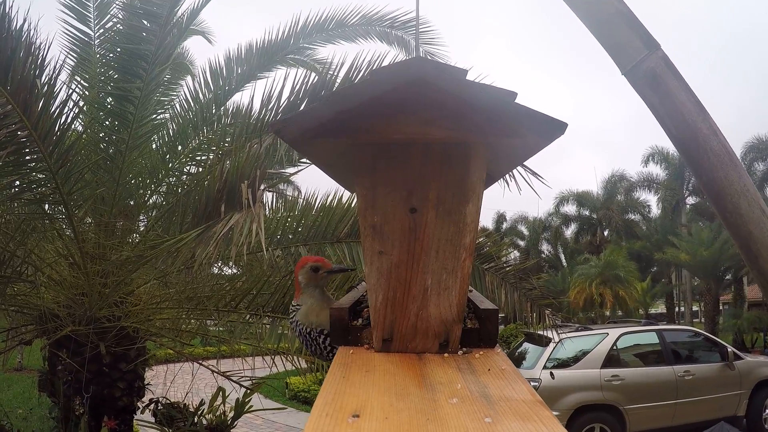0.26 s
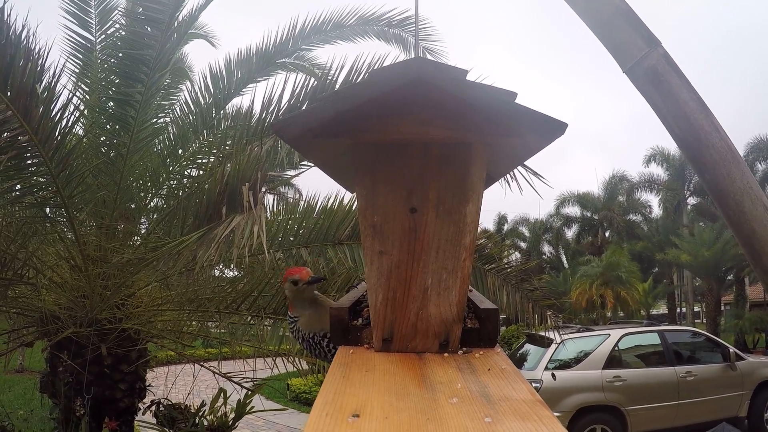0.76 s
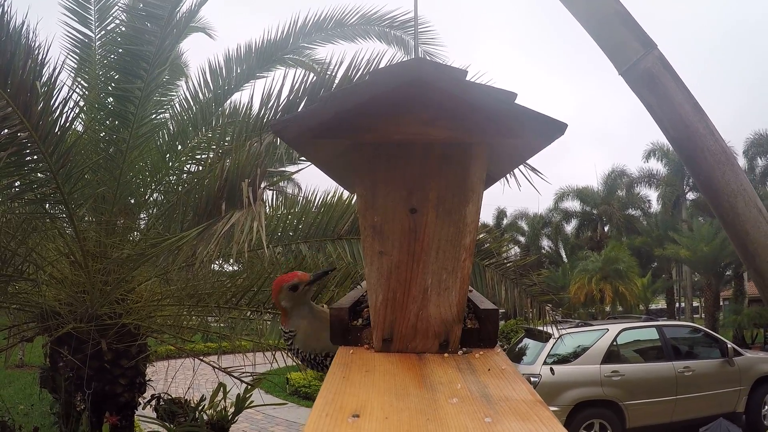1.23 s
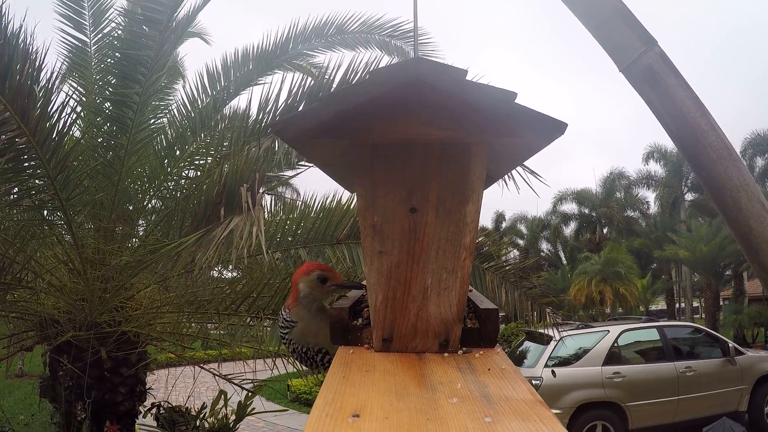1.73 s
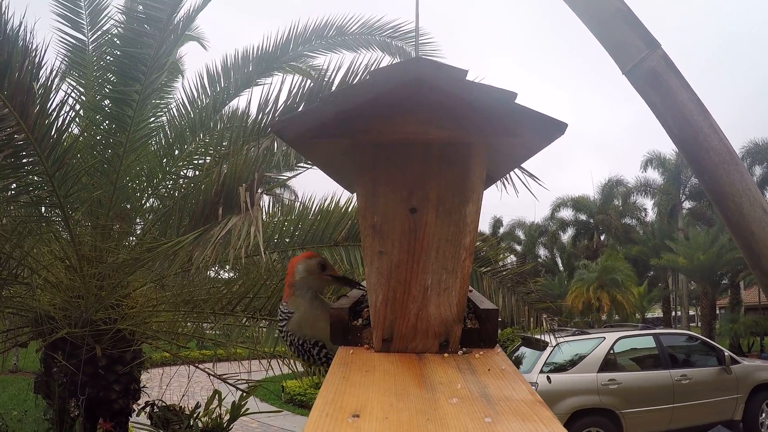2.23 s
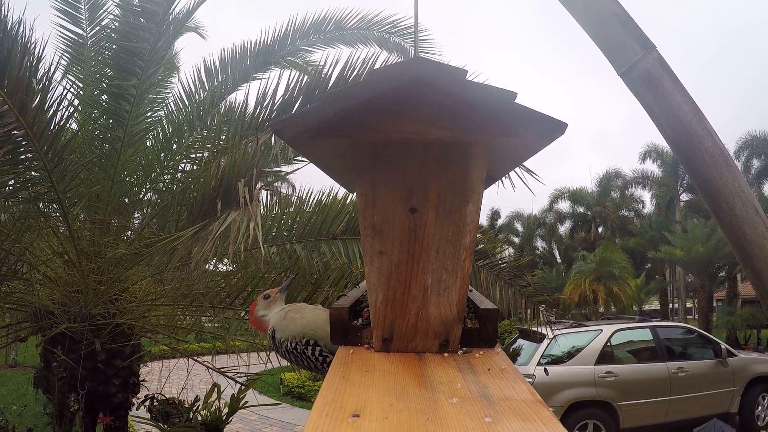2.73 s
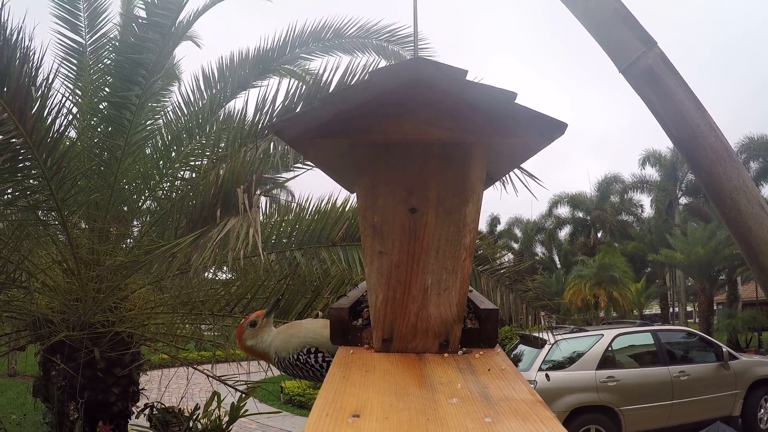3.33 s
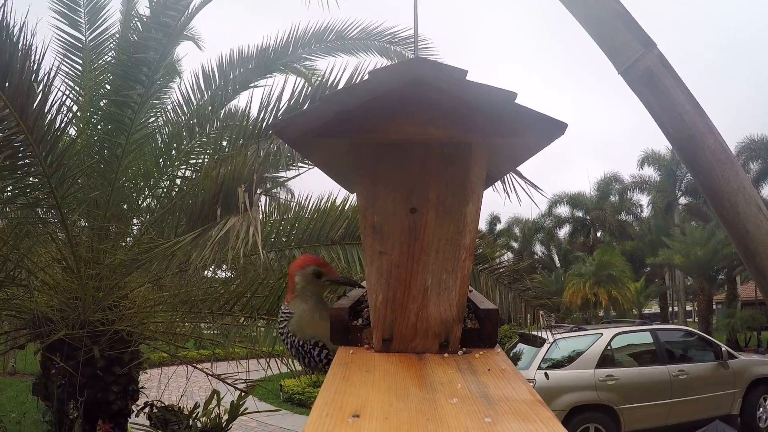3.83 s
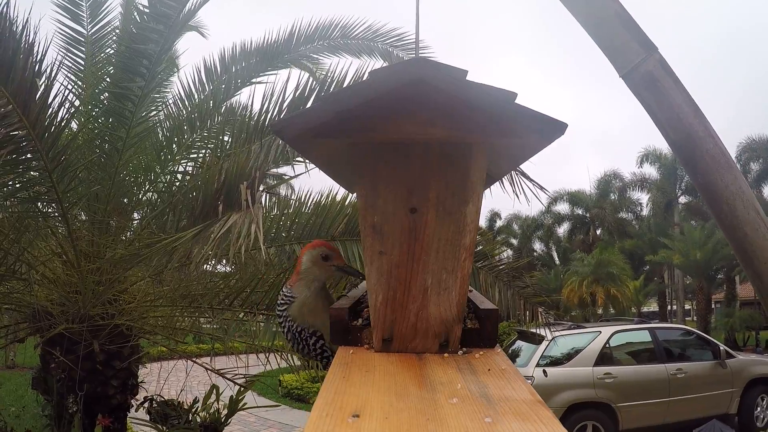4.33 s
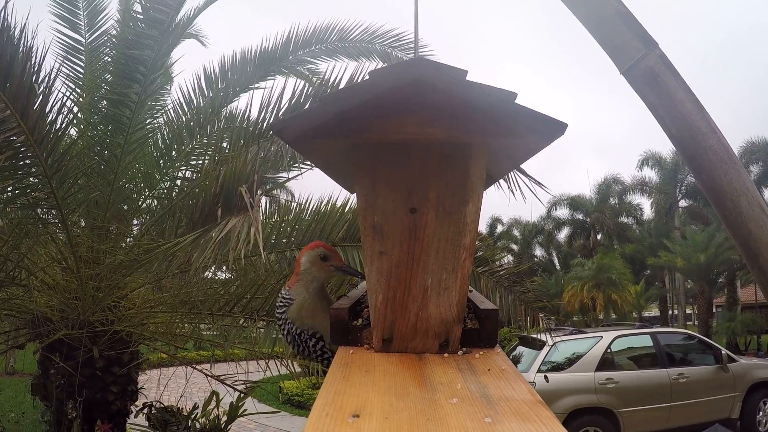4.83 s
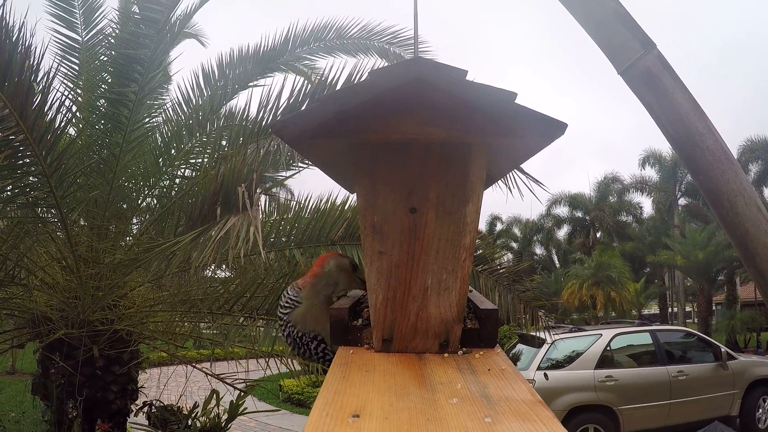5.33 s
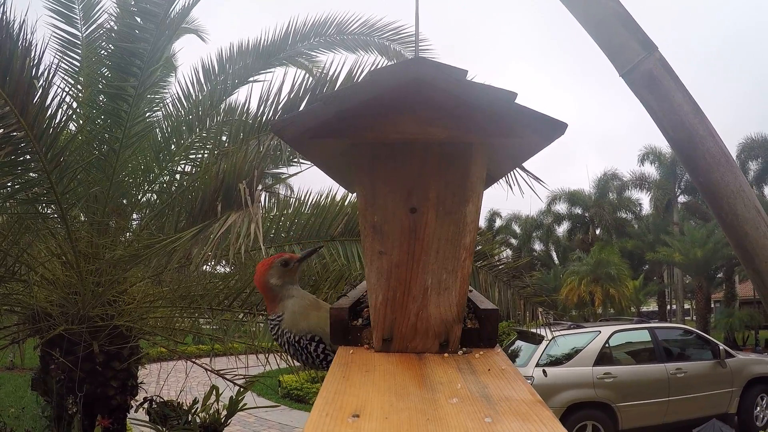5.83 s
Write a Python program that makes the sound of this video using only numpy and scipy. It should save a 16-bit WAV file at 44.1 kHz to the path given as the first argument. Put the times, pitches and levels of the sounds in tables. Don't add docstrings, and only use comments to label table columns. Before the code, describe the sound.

Irregular dry taps of beak and claws on thin boards, with small hollow thuds as weight shifts. The loudest cluster comes early, rattling and scraping for under half a second; afterwards sparse single knocks with quiet gaps. The plank-mounted microphone sways, giving a deep pulsing rumble, strongest at first. Quiet open-air garden, soft hiss, very faint far birds.

```python
import sys
import numpy as np
from scipy import signal
from scipy.io import wavfile
from scipy.ndimage import uniform_filter1d

SR = 44100
rng = np.random.default_rng(int(sys.argv[2]) if len(sys.argv) > 2 else 0)


def volts(x):
    e = np.asarray(x, float) / 20
    return 10 ** e


def dump(signal):
    limited = np.clip(np.atleast_2d(signal).T, -1, 1)
    pcm = np.round(limited * 32767).astype(np.int16)
    wavfile.write(sys.argv[1], SR, pcm)


N = 267510

# hz, t60_s, tray_db, wall_db, perch_db, rim_db (level by place struck)
LOW_MODES = [(342, 0.12, -11, -10, -10, -13), (562, 0.084, -16, -15.5, -7.5, -10),
             (442, 0.13, -17, -13.5, -1.5, -12), (659, 0.081, -3, -6, -7, -3.5), (738, 0.042, 3, 4, 7, -4),
             (816, 0.1, -7, 1, -3, -14)]
MIDDLE_MODES = [(955, 0.015, -9, -3, 0, -4.5), (1087, 0.026, -12.5, -3, 2, -10),
                (1268, 0.045, -19, -8.5, -15, -25), (1398, 0.037, -18, -2, 0, -7.5),
                (1628, 0.029, -3.5, -1.5, -6, -5.5), (1702, 0.014, -5, -4.5, -2.5, 2),
                (1789, 0.026, -4.5, -6.5, -35, -19)]
UPPER_MODES = [(1946, 0.071, -7, -4, -16, -15), (2082, 0.045, -18, -1, -3, 3),
               (2410, 0.017, -4, -3.5, -12, -19), (2578, 0.046, 0, -6.5, -8, -7)]
BRIGHT_MODES = [(2960, 0.036, 0, -11, -18, -14), (3400, 0.017, 8, -2.5, 2, -2),
                (3930, 0.015, -14, -9, -7, -3), (4300, 0.019, 3, -5, 4, -4.5),
                (4700, 0.0094, -15, -5, -6, -6), (5060, 0.0051, -12, -6, -19, -27),
                (5860, 0.012, -15, -7, -11, -1), (6470, 0.0049, -1, -5, -18, -15),
                (6800, 0.0055, -13, -26, -7, 2), (7860, 0.0067, -34, -7, -13, 1)]

# start_s, peak_db (middle modes), low_db, upper_db, bright_db (relative to middle)
TRAY_TAPS = [(0.1295, -31.5, -10.5, -16, -20), (0.1376, -39, -9.5, -16, -29), (0.38, -58, -6, -16, -10),
             (2.1784, -59.5, -5, -5, -10), (3.1246, -34, -8, -8, -22), (3.132, -51, -10, -3, -24),
             (4.1342, -62, -12, -6, -4), (5.6555, -39.5, -14, -20, -17), (2.7127, -55.5, -14, -18, -13),
             (4.0999, -60, 3, -13, -10)]
WALL_TAPS = [(0.0156, -48, -2, -3, -6), (0.025, -41.5, -2, -5, -9), (0.042, -30, -4.5, -17, -16.5),
             (0.3378, -53.5, -19, -15, -14), (0.7715, -54.5, -4, -17, -8), (1.084, -49, -13, -5, -18),
             (1.149, -34, -7.5, -12, -15), (1.156, -25, -18, -9.5, -22), (1.2281, -40.5, -12, -22, -17),
             (1.244, -39.5, -9.5, -25, -17), (1.362, -55, -8, -10, -18), (1.3996, -28, -10, -11.5, -18),
             (1.5087, -56, -2, -18, -15), (1.5489, -53, -6, -25, -19), (1.6376, -61, 2, -14, -11),
             (1.696, -51, -4, -16, -17), (1.7272, -47.5, -1.5, 0, -12), (1.759, -55.5, -8, -5, -10),
             (1.9743, -47, 0, -16, -20), (4.001, -59, -2, -11, -10), (4.1757, -49.5, -10, -5.5, -24),
             (4.1825, -52, -10, -11, -18), (5.656, -40.5, -20, -7.5, -20), (3.0404, -44, -1, -17, -20)]
PERCH_TAPS = [
    (0.2326, -52.5, 5, -16, -7),
    (1.092, -40, -0.5, -17, -25),
    (2.024, -36, -5.5, -13, -21),
    (3.2764, -49, 1, -16, -16),
    (5.3976, -56, 4, -6, -8),
]
RIM_TAPS = [(1.1109, -44, -6, -13, -14), (1.1232, -41, -21, 2.5, -18), (1.1274, -36, -8, -6, -8),
            (2.146, -69, -9, 9, 0), (4.328, -48, -26, -2.5, -23), (4.9774, -51, -8, -2, -21),
            (4.984, -36.5, -5.5, 3, -16.5), (5.0013, -48, -8, -1, -23), (5.011, -51, -14, -4, -18),
            (5.024, -53, -8, -4, -15), (1.99, -61, -9, -10, -18), (2.017, -50, -4, -10, -18),
            (2.04, -58, 1, -14, -18), (4.17, -57, -6, -11, -18), (3.058, -70, -5, -10, -18),
            (4.993, -49, -3, -4, -18)]
# start_s, peak_db, low_db, upper_db, bright_db
CLAW_SLIPS = [(.031, -43, -22, -0.5, -8), (.047, -35, -11, -12, -18), (.052, -38, -4, -14, -20),
              (.058, -38.5, -6, -10, -15), (.063, -42, -10, -10, -20), (.070, -41, -7, -13, -20),
              (.076, -46, -10, -15, -18), (.082, -42, -9, -12, -25), (.091, -52, -8, -4, -18),
              (1.117, -47, -7, -5, -16), (1.134, -49, -5, -7, -14), (1.142, -47.5, -2, -13, -6),
              (1.163, -35, -12, -16, -22), (1.168, -38, -6, -13, -18), (1.174, -38, -6, -11, -18),
              (1.179, -38, -9, -8, -14), (1.185, -38, -11, -8, -18), (1.190, -34, -16, -10, -16),
              (1.195, -34.5, -14, -14, -14), (1.200, -41, -11, -14, -18), (1.209, -39, -8, -13, -20),
              (1.214, -36, -10, -16, -22), (1.219, -45, -4, -12, -22), (1.2958, -46, -3, -15, -16),
              (1.304, -48, -5, -7, -16), (1.312, -56, -8, -6, -16), (1.319, -46.5, -19, -6, -20),
              (1.328, -40.5, -12, -4, -14), (1.334, -35, -4.5, -14, -15), (1.340, -36.5, -11, -11, -14),
              (1.346, -40, -7.5, -15, -10), (1.351, -51, -11, -13, -16), (1.357, -49, -8, -9, -18),
              (1.407, -40, -5, -13, -16), (1.414, -54, -14, -11, -18), (1.426, -39.5, -9, -15, -22),
              (1.433, -40, -8, -20, -25), (1.440, -53, -5, -18, -22)]
# contact_ms, grit_gain
TOUCH = [
    (4.06, 1.4),
    (3.11, 2.2),
    (4.52, 3.1),
    (4.2, 2.2),
]
TIP_HZ = [3540, 4400, 5200]
TIP_ODDS = [.35, 1.2]

# start_s, peak_db, ring_hz, width_hz
TICKS = [(0.026, -47.5, 4200, 250), (.025, -57, 6000, 400), (.043, -53, 3470, 180), (.058, -54, 6100, 350),
         (.071, -60, 4300, 400), (.071, -61, 6000, 350), (.130, -53, 4940, 300), (.131, -57, 6150, 300),
         (.130, -63, 7650, 300), (.133, -56, 3500, 250), (1.091, -53, 3470, 200), (1.092, -56, 6400, 700),
         (1.127, -44.5, 5860, 1490), (1.158, -41, 4330, 180), (1.158, -49, 6430, 400),
         (1.168, -47.5, 3400, 120), (1.177, -53, 6600, 600), (1.179, -51, 4300, 250),
         (1.190, -53, 3500, 200), (1.193, -56, 5200, 1200), (1.23, -55, 4500, 400), (1.245, -61, 3520, 200),
         (1.304, -64, 5470, 300), (1.33, -51, 4340, 250), (1.331, -59, 6800, 250), (1.333, -51, 5300, 500),
         (1.330, -55, 3500, 200), (1.338, -51, 4500, 600), (1.347, -52, 4430, 251.3),
         (1.349, -55, 5200, 400.6), (1.4004, -40.5, 3390, 260), (1.401, -47, 6520, 400),
         (1.400, -52, 7560, 900), (3.125, -46, 3400, 160), (3.125, -55, 4570, 300), (3.043, -64, 4300, 300)]
# start_s, peak_db, ring_hz, width_hz
BOARD_RINGS = [(.016, -48, 960, 70), (0.0156, -50, 1733, 100), (.026, -48, 1087, 60), (.071, -48, 738, 50),
               (.071, -46, 1790, 60), (.131, -45, 775, 50.3), (.133, -48, 1820, 30.2),
               (.1297, -28, 1736, 105), (.137, -40, 1950, 90), (.042, -41, 1370, 150),
               (.047, -38.5, 1750, 250), (.048, -39, 1087, 90), (1.156, -28, 1760, 300),
               (1.337, -42, 816, 50), (1.303, -54, 2030, 120), (5.655, -45, 710, 80),
               (1.118, -42, 2090, 50), (1.149, -48, 2560, 120), (1.218, -51, 2100, 90),
               (1.351, -49, 2040, 89.9), (1.547, -57, 1090, 200), (3.277, -58, 1710, 120),
               (1.082, -52, 1800, 99.6), (1.398, -40, 1490, 300), (.771, -61, 1630, 80),
               (1.092, -44, 800, 90), (1.111, -54, 2040, 70), (1.125, -42, 1710, 80), (1.156, -41, 728, 50),
               (1.154, -30.5, 1394, 60), (1.191, -48, 567, 50.4), (1.228, -50, 1400, 70),
               (1.433, -48, 1410, 90), (1.297, -51, 1087, 59.7), (1.297, -57, 1580, 70),
               (1.333, -48, 2020, 60), (1.346, -44.5, 1087, 60), (1.401, -38.5, 825, 60.7),
               (1.4255, -44, 1790, 250), (1.695, -62, 1087, 60), (1.727, -58, 2068, 59.9),
               (1.728, -52, 556, 50), (1.975, -51.5, 1087, 70), (3.042, -52, 1087, 70),
               (3.043, -57, 540, 50.3), (3.124, -46, 1438, 70), (3.125, -53, 1774, 35.3),
               (4.176, -59, 2500, 250), (4.984, -47, 1444, 70.2), (5.0, -54, 380, 49.88),
               (5.656, -41, 1740, 150.3), (4.125, -66, 1624, 30)]
# start_s, peak_db,
# ring_hz, width_hz
THUDS = [(0.046, -43.5, 206, 42), (1.109, -42, 45.4, 10), (1.151, -35.5, 101, 32), (1.159, -48.5, 202, 21),
         (1.196, -43.5, 297, 72), (1.401, -43.5, 290, 110), (1.728, -54, 210, 48), (2.026, -43, 476, 80),
         (2.031, -53, 149, 70), (3.13, -40, 132.3, 95), (4.984, -48, 380, 130), (5.023, -46, 115, 28),
         (5.657, -51, 417, 90), (6.0597, -43.5, 74.6, 37)]

# top_s, level_db, half_length_s
SWELLS = [(.0, -35, 0.062), (0.142, -27, 0.12), (0.326, -29, 0.2), (0.55, -34, 0.079), (0.722, -37.5, 0.15),
          (0.963, -41, 0.13), (1.204, -25.5, 0.15), (1.436, -29.5, 0.13), (1.612, -33.5, 0.17),
          (1.838, -35, 0.14), (2.08, -36.5, 0.14), (2.238, -37, 0.12), (2.436, -34.5, 0.1),
          (2.641, -39, 0.17), (2.872, -39, 0.096), (3.045, -44, 0.063), (3.218, -32, 0.074),
          (3.276, -36, 0.08), (3.403, -38.5, 0.15), (3.597, -44, 0.094), (3.855, -46, 0.16),
          (4.105, -38, 0.11), (4.37, -39.5, 0.15), (4.594, -41.5, 0.095), (4.77, -49, 0.12),
          (5.09, -33, 0.097), (5.29, -39, 0.14), (5.476, -35, 0.12), (5.689, -33, 0.11), (5.907, -38, 0.11)]
# time_s, mode_hz
STANCE = [(0, 26.3), (.12, 25.21), (1.0, 25.7), (1.5, 29.57), (2.22, 30.31), (2.31, 25.23), (2.67, 25.74),
          (2.76, 29.34), (3.2, 29.84), (3.92, 29.26), (4.1, 26.49), (4.9, 26.1), (5.03, 28.87), (5.3, 29.9),
          (6.07, 30.2)]

# mode_hz, width_hz, gain_db
PLANK_MODES = [
    [(61, 7.1, -1)],
    [(111.6, 11.3, -0.5), (124.14, 3.7, 1.5)],
    [(162, 30, -2.5), (203.3, 6, -2), (222.6, 14.5, -10.5)],
]
# start_s, level_db, t60_s, favoured_bending (0-2)
JOLTS = [(.0, -44, 0.3, 1.36), (.05, -42.5, 0.81, 0.99), (.16, -46.5, 0.13, 1.01), (.33, -48, 0.73, 0.008),
         (.53, -56.5, 1.5, 0.009), (.75, -57, .6, .01), (1.13, -44, 1.2, 1.22), (1.361, -45.5, 0.67, 0.3),
         (1.729, -54, 0.24, 1.99), (1.79, -60.5, 0.52, 1.01), (2.03, -49.5, 0.43, 1.17),
         (2.23, -59, 0.17, 0.98), (3.13, -51, 0.36, 1.2), (3.32, -57, 0.46, 1.13), (3.63, -66, 0.67, 1.01),
         (3.99, -60, 0.621, 1.5), (4.19, -52.5, 0.27, 1.1), (4.37, -56.5, 0.26, 1.57),
         (5.01, -52, 0.73, 1.07), (5.42, -56.5, 0.77, 1.24), (5.47, -56, 0.47, 0.32),
         (5.67, -60, 0.39, 0.99), (5.78, -66, 0.19, 0.83)]
REST_DB = [-71.5, -73, -77.5]

# start_s, length_s, start_hz, end_hz, level_db
BIRDS = [(0.152, 0.087, 2670, 2400, -69.5), (0.504, 0.15, 2680, 2250, -73), (1.602, 0.036, 2410, 2400, -71),
         (2.19, 0.021, 1790, 1950, -64.5), (2.319, .03, 2320, 2320, -72), (2.423, 0.02, 2410, 2350, -67),
         (3.396, 0.03, 4400, 4500, -68.5), (3.434, 0.12, 4550, 4500, -77), (3.407, 0.05, 3004, 2960, -71),
         (3.424, 0.13, 2730, 2690, -71), (3.776, 0.098, 3200, 2477, -72)]
# freq_hz, density_db (per Hz)
HISS = [(24, -24.5), (40, -14), (46, -18.5), (54, -25), (86, -22), (145, -32.5), (173, -31), (322, -34.5),
        (467, -36.5), (599, -38), (827, -41.5), (2230, -42), (15100, -54.5)]
# pitch_hz, level_db
WHINE = (8541, -89)
# start_s, length_s
TREBLE_GAPS = [(0, .03), (.12, .21), (.5, .06), (.67, .04), (1.14, .015), (1.238, .025), (1.388, .09),
               (1.606, .09), (1.78, .05), (2.019, .055), (2.192, .035), (2.398, .03), (3.114, .08),
               (3.262, .025), (4.987, .17), (5.434, .035), (5.648, .015)]

LOW_LAG_S, TICK_TOUCH_S = 0.0013, 0.00222
MIDWAY_HZ, LEAN = 27.47, 0.46
SWELL_RISE, SWELL_FALL, SWELL_SHARPNESS = 1.08, 1.215, 1.66
JOLT_RISE_S, JOLT_SPREAD_DB = 0.054, 11.5
BLUR_HZ, BLUR_PER_GLIDE = 120, 0.66
HISS_DB = -65
GAP_FROM_HZ, EDGE_HZ = 13000, 15250


def evened(x):
    return x / np.sqrt(np.mean(x ** 2) + 1e-20)


def peaked(x):
    return x / np.max(abs(x))


def add(mix, start_s, sound):
    part = mix[max(round(start_s * SR), 0):][:len(sound)]
    part += sound[:len(part)]


def resonate(x, hz, width_hz):
    turn = np.exp(2j * np.pi * np.cumsum(hz * np.ones(len(x))) / SR)
    r = np.exp(-np.pi * width_hz / SR)
    return 2 * (turn * signal.lfilter([1 - r], [1, -r], x / turn + 1e-18)).real


def bird_on_wood():
    out = np.zeros(N)
    for place, rows in enumerate((TRAY_TAPS, WALL_TAPS + CLAW_SLIPS, PERCH_TAPS, RIM_TAPS)):
        for row, chance in zip(rows, rng.standard_normal(size=(len(rows), 2460))):
            add(out, *contact(row, place, chance))
    return signal.sosfilt(signal.butter(4, 8300, fs=SR, output="sos"), out)


def contact(row, place, chance, scatter_db=1.74, focus_db=5.0, lead=0.3316, firm=0.52, dry_db=6.5):
    start_s, peak_db, low_db, upper_db, bright_db = row
    tip_hz = TIP_HZ[np.searchsorted(TIP_ODDS, chance[59])]
    contact_ms, rough = TOUCH[place]
    rough = rough * volts(-firm * max(peak_db + 47.5, 0))
    grit = chance[60:] * abs(chance[60:]) ** 0.67
    t = np.arange(len(grit)) / SR
    u = t / (max(contact_ms, 0.3) / 1000)
    push = u ** 0.6 * np.exp(-2 * u ** 1.8)
    early_db = dry_db * (1 - np.exp(-t / 0.0049))
    groups = (
        (LOW_MODES, low_db, 0),
        (MIDDLE_MODES, 0, 0),
        (UPPER_MODES, upper_db, 0),
        (BRIGHT_MODES, bright_db, focus_db))
    out, first = 0, 0
    for modes, group_db, fall_db in groups:
        hz, t60_s, *place_db = np.transpose(modes)[:, :, None]
        scatter, phase = chance[:60].reshape(2, -1, 1)[:, first:first + len(modes)]
        hz = hz * (1 + 0.0017 * fall_db * np.sin(7 * phase))
        away_db = fall_db * np.tanh(abs(np.log2(hz / tip_hz)) / 0.29)
        level_db = place_db[place] + scatter_db * scatter - away_db
        ring = volts(level_db - early_db - 60 * t / t60_s) * np.sin(2 * np.pi * hz * t)
        drive = push * (np.cos(2 * np.pi * (hz * t + phase)) + rough * grit)
        rung = signal.fftconvolve(drive[:, :1024], ring, axes=1)[:, :len(t)]
        rung = peaked(rung.sum(axis=0))
        lag_s = LOW_LAG_S * (first == 0)
        out = out + volts(group_db) * np.interp(t - lag_s, t, rung, left=0)
        first += len(modes)
    return start_s - lead * contact_ms / 1000, volts(peak_db) * out


def ticks():
    out, u = np.zeros(N), np.arange(1500) / SR / TICK_TOUCH_S
    grits = rng.standard_normal(size=(len(TICKS), 1500))
    for (start_s, peak_db, hz, width_hz), grit in zip(TICKS, grits):
        burst = u * np.exp(-u ** 1.7) * grit
        ring = resonate(resonate(burst, hz, width_hz), hz, 2.5 * width_hz)
        add(out, start_s - TICK_TOUCH_S, volts(peak_db) * peaked(ring))
    return out


def thuds_and_rings():
    out, click = np.zeros(N), np.eye(1, 8000)[0]
    for start_s, peak_db, hz, width_hz in THUDS + BOARD_RINGS:
        ring = resonate(resonate(click, hz, width_hz), hz, 2.9 * width_hz)
        add(out, start_s, volts(peak_db) * peaked(ring))
    return out


def sway():
    t, coarse_s = np.arange(N) / SR, np.arange(0, N + 64, 64) / SR
    stance_s, mode_hz = np.transpose(STANCE)
    lead = 2 * np.pi * np.cumsum(np.interp(t, stance_s, mode_hz) - MIDWAY_HZ) / SR
    top_s, level_db, half_s = np.transpose(SWELLS)[:, :, None]
    share = np.where(coarse_s < top_s, SWELL_RISE, SWELL_FALL)
    place = np.clip((coarse_s - top_s) / (share * half_s), -1, 1)
    power = (volts(level_db) * abs(np.cos(np.pi / 2 * place)) ** SWELL_SHARPNESS) ** 2 + 1e-12
    near = power + volts(-60.0 - 60.0 * abs(coarse_s - top_s) / half_s)
    held = (near * np.interp(top_s, t, lead)).sum(axis=0) / near.sum(axis=0)
    angle = 2 * np.pi * MIDWAY_HZ * t + LEAN * lead + (1 - LEAN) * np.interp(t, coarse_s, held)
    swell = np.interp(t, coarse_s, np.sqrt(power.sum(axis=0) + volts(-58.0) ** 2))
    rocking = resonate(resonate(rng.standard_normal(N), 13.2, 4.6), 13.8, 4.6)
    tone = np.sin(angle) + volts(-35.0) * np.sin(2 * angle + 1.7)
    return np.sqrt(2) * swell * tone + volts(-53.5) * evened(rocking)


def plank():
    out = np.zeros(N)
    for bending, modes in enumerate(PLANK_MODES):
        noise = rng.standard_normal(N)
        body = 0
        for hz, width_hz, gain_db in modes:
            mode = resonate(resonate(noise, hz, 2 * width_hz), hz, 2 * width_hz)
            body = body + volts(gain_db) * evened(mode)
        steady = body / np.sqrt(uniform_filter1d(evened(body) ** 2, size=4000) + 0.06)
        out += uniform_filter1d(shaking(bending), size=600) * evened(steady)
    return out


def shaking(bending):
    start_s, level_db, t60_s, favoured = np.transpose(JOLTS)[:, :, None]
    since_s = np.arange(0, N + 64, 64) / SR - start_s
    shape_db = np.where(since_s < 0, 20 * since_s / JOLT_RISE_S, -60 * since_s / t60_s)
    jolt_db = level_db - JOLT_SPREAD_DB * abs(bending - favoured) + shape_db
    power = volts(REST_DB[bending]) ** 2 + (volts(jolt_db) ** 2).sum(axis=0)
    return np.interp(np.arange(N), np.arange(len(power)) * 64, np.sqrt(power))


def far_birds():
    out = np.zeros(N)
    for start_s, length_s, start_hz, end_hz, level_db in BIRDS:
        width_hz = BLUR_HZ + BLUR_PER_GLIDE * abs(end_hz - start_hz)
        noise = rng.standard_normal(size=8000)[:round(length_s * SR)]
        hz = np.linspace(start_hz, end_hz, len(noise))
        fade = np.minimum(np.arange(len(noise)) / 300, 1) * np.linspace(1.3, 0.4, len(noise))
        whistle = evened(resonate(resonate(noise, hz, width_hz), hz, width_hz))
        add(out, start_s, volts(level_db) * fade * whistle)
    return out


def hiss():
    frames, hz = N // 256 + 5, np.fft.rfftfreq(2048, 1 / SR)
    a, b, patches = rng.standard_normal((frames // 2, len(hz), 3)).T
    patches = uniform_filter1d(patches, size=24, axis=0)
    patches = evened(uniform_filter1d(patches, size=6, axis=1))
    freq_hz, density_db = np.transpose(HISS)
    curve_db = np.interp(np.log(hz + 1), np.log(freq_hz + 1), density_db)
    z = (a + 1j * b) * volts(curve_db[:, None] + 0.92 * patches)
    x = signal.istft(z, nperseg=2048, noverlap=1536)[1][:N]
    above = signal.sosfilt(signal.butter(2, 300, "high", fs=SR, output="sos"), x)
    whine_hz, whine_db = WHINE
    whine = volts(whine_db) * evened(resonate(rng.standard_normal(N), whine_hz, 33))
    return volts(HISS_DB) * x / np.std(above) + whine


def scene():
    bird = bird_on_wood() + ticks() + thuds_and_rings()
    mount = sway() + plank()
    return (bird + mount + far_birds() + hiss())[None]


def treble_gaps(x):
    hz, t, z = signal.stft(x, SR, nperseg=512)
    gap = sum((t >= s) & (t < s + length_s) for s, length_s in TREBLE_GAPS) > 0
    islands = rng.random((33, len(t) // 4 + 1)) < 0.2
    islands = np.repeat(np.repeat(islands, 8, axis=0), 4, axis=1)
    lost = (hz > GAP_FROM_HZ)[:, None] & gap & ~islands[:len(hz), :len(t)]
    return signal.istft(z * np.where(lost, volts(-40), 1), SR, nperseg=512)[1][:, :N]


def roll_off(x):
    return signal.sosfilt(signal.butter(12, 15240, fs=SR, output="sos"), x)


def record(dry):
    low_pass = signal.firwin(511, EDGE_HZ, window=("kaiser", 9), fs=SR)
    mix = treble_gaps(signal.oaconvolve(dry, low_pass[None], "same"))
    return roll_off(mix)


dry = scene()
out = record(dry)
dump(out)
```